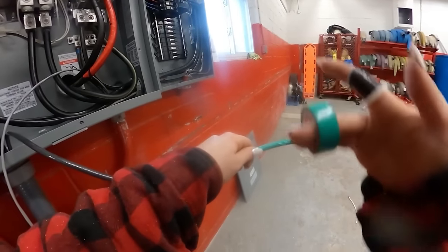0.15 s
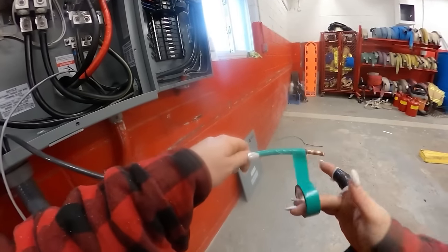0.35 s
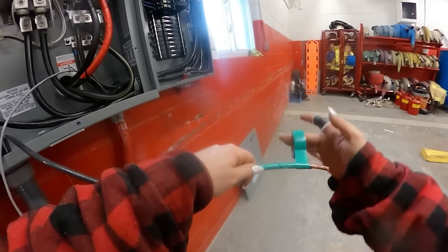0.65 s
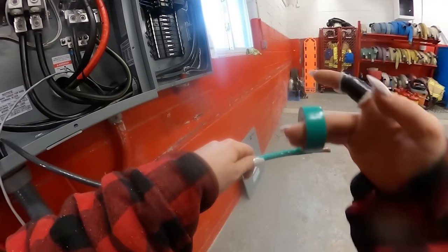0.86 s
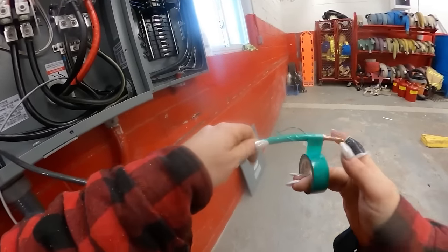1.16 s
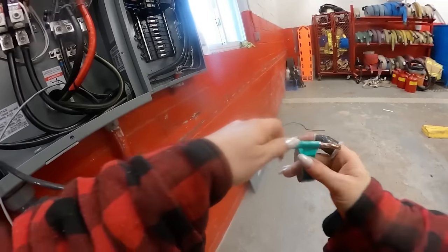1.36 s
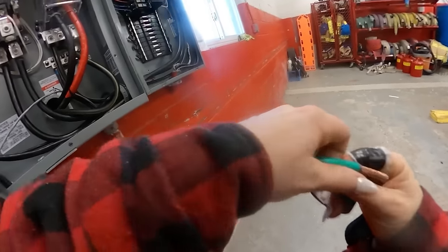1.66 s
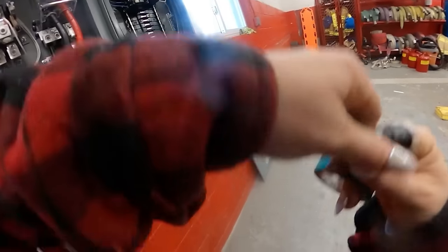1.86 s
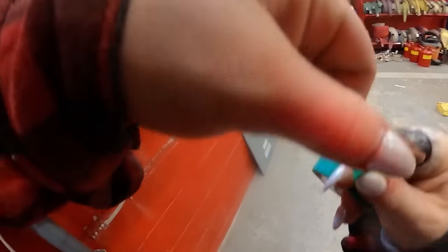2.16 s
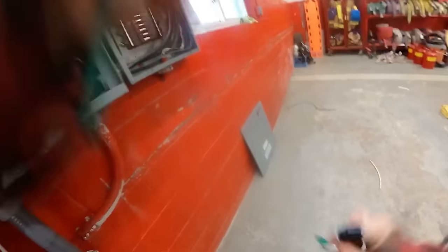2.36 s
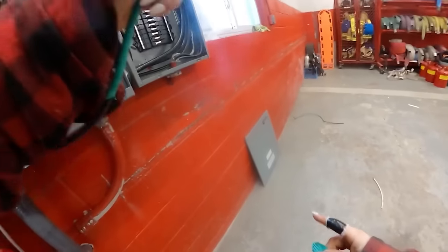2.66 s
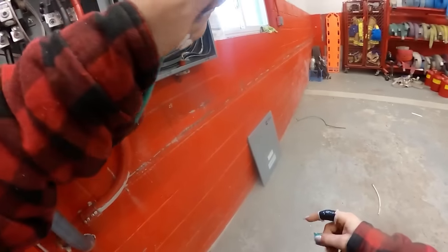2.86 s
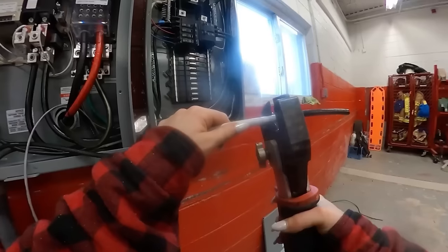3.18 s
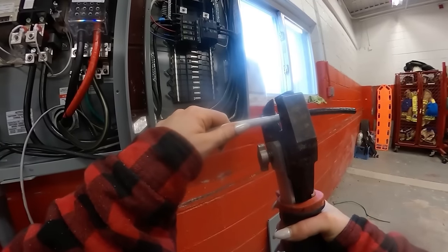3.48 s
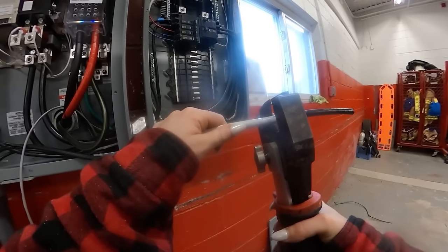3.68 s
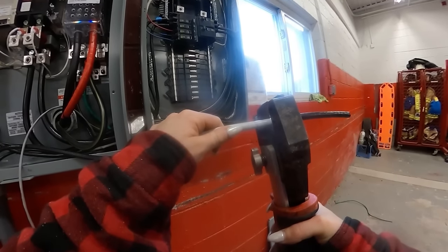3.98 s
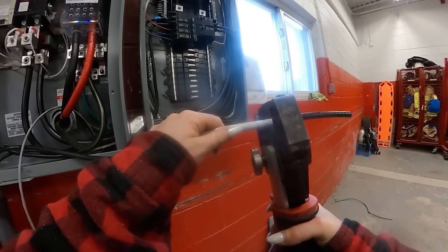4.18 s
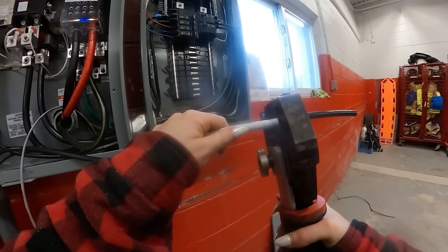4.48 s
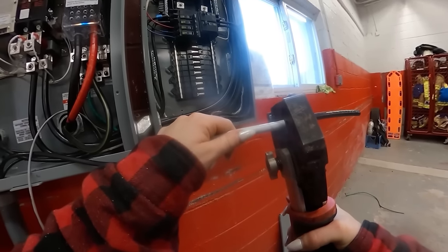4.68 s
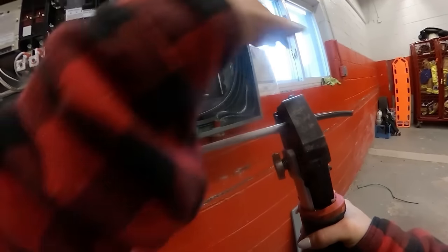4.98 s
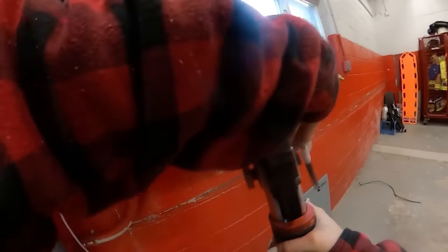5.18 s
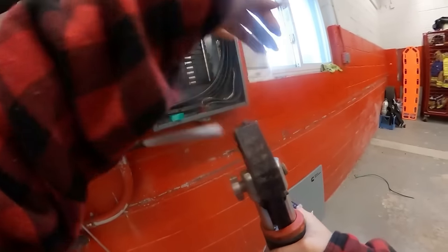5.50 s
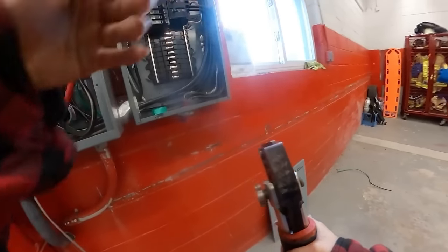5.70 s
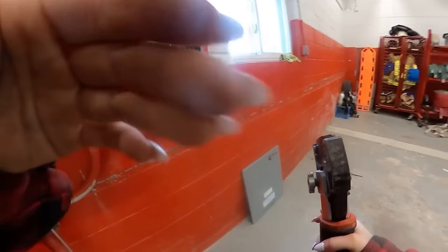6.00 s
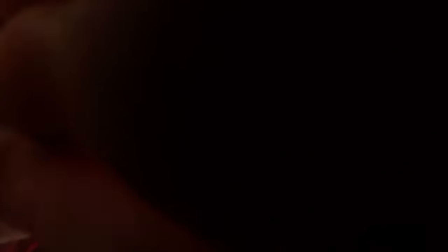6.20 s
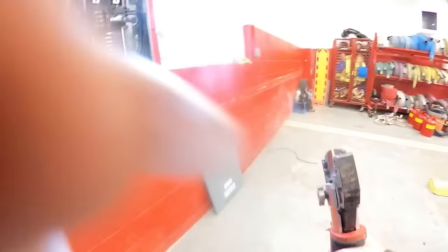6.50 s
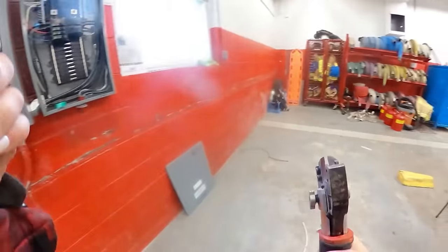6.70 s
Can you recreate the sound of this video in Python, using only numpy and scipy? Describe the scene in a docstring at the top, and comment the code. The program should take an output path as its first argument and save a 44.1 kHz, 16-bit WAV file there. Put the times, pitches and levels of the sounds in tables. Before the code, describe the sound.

Quiet close handling first: adhesive tape peeling, a roll swishing, small ticks and cloth rumble. A crack and heavy bump break the tape, and wire knocks in its panel. Then a buzzing electric crimper holds a hard, gear-rich whine, labouring slightly before clunks, an oil hiss and short gliding whistles. Jaws click open with hall-like echo; a hand scrapes and thuds against the body-worn microphone.

```python
"""Tape and battery crimper in a workshop bay

Close to a body-worn camera, tape crackles off its roll round a wire and snaps; the wire rattles (noise, damped bursts).
A crimper runs two seconds: shaft orders and gear noise sag and squeal under load, then the valve hisses and whistles.
The jaws click open; a hand bumps and rubs the camera (swinging jolts, shaped noise) over air and an early low hum."""
import sys
import numpy as np
from scipy import signal
from scipy.fft import rfft, irfft, next_fast_len
from scipy.io import wavfile
from scipy.ndimage import map_coordinates

SR = 44100
rng = np.random.default_rng(int(sys.argv[2]) if len(sys.argv) > 2 else 0)


def materialize(psi):
    """Save the field psi as 16-bit PCM at rate SR to the path in sys.argv[1].

    A 1-D psi becomes a single channel; in a 2-D psi each row is a channel.
    """
    bounded = np.clip(np.atleast_2d(psi).T, -1, 1)
    quanta = np.round(bounded * 32767).astype(np.int16)
    wavfile.write(sys.argv[1], SR, quanta)


N = 302085


def amp(db):
    """Decibels to gain."""
    return 10 ** (np.asarray(db) / 20)


def unit(x):
    """Scale to rms 1."""
    return x / np.sqrt(np.mean(x ** 2) + 1e-20)


def clock():
    """Time of every sample, in seconds."""
    return np.arange(N) / SR


def along(points, hz):
    """(hz, value) points interpolated on a log frequency axis."""
    point_hz, value = np.transpose(points)
    return np.interp(np.log(hz + 1), np.log(point_hz + 1), value)


def curve(points):
    """(time_s, value) points interpolated to one value per sample."""
    time_s, value = np.transpose(points)
    return np.interp(clock(), time_s, value)


def wobble(rate_hz):
    """Smooth random curve with rate_hz knots a second."""
    knots = rng.standard_normal(int(N * rate_hz / SR) + 4)
    return map_coordinates(knots, [np.arange(N) * rate_hz / SR])


def turning(hz):
    """Phase in radians of something that turns at hz."""
    return 2 * np.pi * np.cumsum(hz) / SR


def filtered(x, response):
    """Multiply the spectrum of x by a response of frequency."""
    size = x.shape[-1]
    padded = next_fast_len(size + SR // 10)
    spectrum = rfft(x, padded) * response(np.fft.rfftfreq(padded, 1 / SR))
    return irfft(spectrum, padded)[..., :size]


def envelope(start_s, length_s, attack_s, release_s):
    """Swell from start_s, hold until length_s is over, then die by 60 dB per release_s."""
    t = clock() - start_s
    swell = np.clip(t / attack_s, 0, 1) ** 2
    return swell * amp(-60 * np.clip((t - length_s) / release_s, 0, 3))


def strokes(rows, attack_s, release_s):
    """Power-summed gain of (start_s, length_s, level_db) strokes with a shared attack and release."""
    power = sum((amp(level_db) * envelope(start_s, length_s, attack_s, release_s)) ** 2
                for start_s, length_s, level_db in rows)
    return np.sqrt(power)


# left-right likeness of sounds in the bay: freq_hz, likeness
BAY_LIKENESS = [(100, .99), (500, 0.99), (1000, 1), (1400, 0.83), (3000, 0.8), (6000, 0.66), (12000, 0.82)]
# left-right likeness of sounds right at the ports: freq_hz, likeness
NEAR_LIKENESS = [(100, 1), (900, 0.27), (1500, 0.087), (10000, 0.41)]


def ports(pair, likeness):
    """Two unrelated signals become what two close microphone ports hear."""
    def mid_side(hz):
        angle = np.arccos(np.clip(along(likeness, hz), -1, 1)) / 2
        return np.array([np.cos(angle), np.sin(angle)])

    mid, side = filtered(pair, mid_side)
    return np.array([mid + side, mid - side])


def rush(spectrum, likeness, grain_db=0):
    """Coloured stereo noise of rms 1; grain_db breaks it into tiny grains."""
    grains = rng.standard_normal((2, N)) * amp(grain_db * wobble(1500))
    return unit(filtered(ports(grains, likeness), lambda hz: amp(along(spectrum, hz))))


def add(track, start_s, sound):
    """Mix a sound into the track at start_s."""
    part = track[..., round(start_s * SR):][..., :sound.shape[-1]]
    part += sound[..., :part.shape[-1]]


def blows(rows, likeness, t60_s, width, hardness):
    """Each contact is a push and a dying rattle in a broad resonance (width: share of its centre)."""
    out, t = np.zeros((2, N)), np.arange(SR // 4) / SR
    fade = amp(-60 * t / t60_s)
    push = hardness * np.linalg.norm(fade) * (t == 0)
    for start_s, level_db, centre_hz in rows:
        def body(hz):
            damping = 1j * hz * centre_hz * width
            return (damping / (centre_hz * centre_hz - hz * hz + damping)) ** 2

        rattle = ports(rng.standard_normal((2, len(t))), likeness) * fade
        hit = unit(filtered(push + rattle, body)) * np.sqrt(np.mean(fade ** 2))
        add(out, start_s, amp(level_db) * hit)
    return out


# decay of the bay: freq_hz, t60_s
BAY_DECAY = [(100, 3.2), (500, 0.95), (2000, 1.55), (4000, 2.03), (7000, 1.05), (10000, 0.46), (13000, 0.7)]


def bay(x):
    """Hard walls answer after 10 ms with a diffuse tail that decays at its own rate in each band."""
    hz, t, noise = signal.stft(rng.standard_normal((2, 2 * SR)), SR, nperseg=256)
    fading = noise * amp(-60 * t / along(BAY_DECAY, hz)[:, None])
    tail = ports(signal.istft(fading, SR, nperseg=256)[1], BAY_LIKENESS)
    late = np.pad(x.mean(axis=0), (SR // 100, 0))[None]
    return signal.fftconvolve(late, tail / np.linalg.norm(tail[0]), axes=1)[:, :N]


# level of the hum: time_s, level_db
HUM_LEVEL = [(0, -43), (0.9, -40), (1.4, -33), (2.2, -34.5), (2.7, -40.5), (3.1, -39.5), (3.2, -87.5)]
# spectrum of moving air: freq_hz, relative_db
AIR_SPECTRUM = [(60, 6), (200, -7.5), (400, -3.5), (800, -15.5), (1700, -10.5), (3000, -26.5), (7000, -21),
                (15000, -48.5)]


def background(hum_hz=72, air_db=-60):
    """A machine hums somewhere in the bay as one unsteady sine, over the noise of moving air."""
    tone = unit(np.sin(turning(hum_hz + .5 * wobble(2))))
    hum = amp(curve(HUM_LEVEL) + .5 * wobble(5.1)) * tone
    return hum + amp(air_db) * rush(AIR_SPECTRUM, BAY_LIKENESS)


# arm movements: start_s, length_s, sleeve_db, rumble_db
ARM_MOVES = [(0, 0.88, -66, -38.5), (1.03, 1.46, -58, -35), (2.446, .3, -52, -46.5),
             (5.42, .63, -46.5, -43), (6.18, .1, -40, -36.5), (6.45, .17, -52, -35),
             (6.72, .13, -46, -36.5)]
# sleeve noise: freq_hz, relative_db
CLOTH_SPECTRUM = [(60, -19.5), (150, 2), (300, -5), (700, -16.5), (2000, -28), (8000, -45), (15000, -57.5)]
# camera mount rumble: freq_hz, relative_db
RUMBLE_SPECTRUM = [(11, -38), (18, -1.5), (44, 7.5), (64, 4), (84, 0), (194, -26), (300, -40.5), (390, -47),
                   (660, -120)]
STILL_CLOTH_DB, STILL_RUMBLE_DB = -60, -45  # at rest


def arm_movement(attack_s=0.066, release_s=0.57):
    """The moving arm brushes the sleeve and shakes the camera: broad noise and low rumble."""
    brushing = strokes([(s, length_s, db) for s, length_s, db, _ in ARM_MOVES], attack_s, release_s)
    shaking = strokes([(s, length_s, db) for s, length_s, _, db in ARM_MOVES], attack_s, release_s)
    cloth = np.hypot(amp(STILL_CLOTH_DB), brushing) * amp(2 * wobble(12))
    rumble = np.hypot(amp(STILL_RUMBLE_DB), shaking) * amp(wobble(6.5))
    return (cloth * rush(CLOTH_SPECTRUM, BAY_LIKENESS, grain_db=1)
            + rumble * rush(RUMBLE_SPECTRUM, BAY_LIKENESS))


# skin drags over the camera case: start_s, swell_s, fade_t60_s, level_db
SKIN_RUBS = [(6.165, 0.022, 0.11, -43), (6.205, 0.039, .34, -31.5), (6.2, .425, 0.03, -32)]
# skin noise: freq_hz, relative_db
SKIN_SPECTRUM = [(400, -10.5), (850, -19.5), (1250, 3), (2500, 0.5), (3300, -4.5), (4100, -1.5), (4900, -6),
                 (6600, 1.5), (7500, -4.5), (8300, -13.5), (15000, -25)]
RUB_PAN_DB = 2.5  # left minus right: the hand rubs nearer the left port


def rubbing():
    """Skin sticks and slips on the camera case as grainy noise."""
    drag = sum(amp(level_db) * envelope(start_s, swell_s, swell_s, fade_s)
               for start_s, swell_s, fade_s, level_db in SKIN_RUBS)
    pan = amp([[RUB_PAN_DB / 2], [-RUB_PAN_DB / 2]])
    return drag * pan * amp(wobble(30)) * rush(SKIN_SPECTRUM, NEAR_LIKENESS, grain_db=2.5)


# fingers tap the camera case: start_s, level_db, centre_hz
CASE_TAPS = [(2.381, -13, 180), (6.1605, -19, 3200), (6.161, -15.5, 900), (6.162, -18, 220),
             (6.5185, -19, 2300), (6.6013, -15, 1700), (6.602, -18, 150), (6.611, -22, 4000),
             (6.625, -17, 1500)]
# jolts of the camera: start_s, level_db, pitch_hz, length_s, left_minus_right_db
CAMERA_JOLTS = [(2.369, -7.5, 63.3, 0.039, 1), (6.147, -18, 45.3, 0.04, -9), (6.176, -14.5, 66, 0.03, -7),
                (6.599, -19.5, 64.4, 0.036, -5)]


def bumps():
    """Taps excite the case; jolts swing it briefly at a low pitch."""
    out = blows(CASE_TAPS, NEAR_LIKENESS, t60_s=0.021, width=1.06, hardness=0.39)
    for start_s, level_db, pitch_hz, length_s, pan_db in CAMERA_JOLTS:
        t = np.arange(int(length_s * SR)) / SR
        sway = -np.sin(2 * np.pi * pitch_hz * t) * np.sin(np.pi * t / length_s) ** 2
        add(out, start_s, amp([[level_db + pan_db / 2], [level_db - pan_db / 2]]) * sway)
    return out


# the wire knocks about in its panel: start_s, level_db, centre_hz
WIRE_KNOCKS = [(1.804, -46, 700), (1.961, -50, 800), (2.407, -32.5, 1200), (2.425, -31, 546),
               (2.46, -35, 900), (2.495, -35, 720), (2.518, -29.5, 540), (2.661, -37.5, 1000),
               (2.694, -33.5, 720), (2.968, -49, 1800), (5.92, -39, 387)]


def wire():
    """The wire strikes its panel, which rattles in a broad resonance."""
    return blows(WIRE_KNOCKS, BAY_LIKENESS, t60_s=.14, width=1.36, hardness=.42)


# the tape parting: freq_hz, level_db, t60_s
SNAP_MODES = [(800, -4.5, 0.0018), (2500, 4.5, 0.0019), (4000, -1.5, 0.0022), (6000, -1, 0.0043),
              (9200, -7, 0.0042)]
SNAP_S = 2.381


def snap():
    """The stretched tape parts in one crack of heavily damped sines."""
    out, t = np.zeros((2, N)), np.arange(SR // 20) / SR
    crack = sum(amp(level_db - 60 * t / t60_s) * np.sin(2 * np.pi * freq_hz * t)
                for freq_hz, level_db, t60_s in SNAP_MODES)
    add(out, SNAP_S, crack)
    return out


# pulls that peel tape off the roll: start_s, length_s, level_db
TAPE_PULLS = [(0, 0.34, -69), (.91, .17, -62.5), (1.25, .2, -67), (1.46, 0.093, -55.5), (1.66, .3, -61.5),
              (1.95, .16, -50)]
# peeling noise: freq_hz, relative_db
PEEL_SPECTRUM = [(500, -8), (1200, -0.5), (2200, 1.5), (3300, -2), (4300, -3), (7000, 3.5), (9000, 1.5),
                 (15000, -8.5)]
# the roll slides round the finger: start_s, length_s, level_db
ROLL_SLIDES = [(0, 0.075, -69), (.16, .08, -59), (.62, 0.14, -75.5), (.9, .12, -61), (1.48, 0.046, -62),
               (2.06, .04, -52.5)]
# sliding noise: freq_hz, relative_db
ROLL_SPECTRUM = [(3000, -25.5), (4800, -9.5), (5700, -1), (6500, 3), (7300, -9), (12000, -25)]
TAUT_DB, NEARING_DB_PER_S = -84, 6.5  # taut tape crackles more as the hands come closer


def tape():
    """The glue lets go in a fine crackle, while the roll swishes round the finger."""
    taut = amp(TAUT_DB + NEARING_DB_PER_S * clock()) * (clock() < SNAP_S)
    glue = np.hypot(taut, strokes(TAPE_PULLS, attack_s=0.051, release_s=.17))
    peel = glue * amp(1.6 * wobble(40)) * rush(PEEL_SPECTRUM, NEAR_LIKENESS, grain_db=3.0)
    slide = strokes(ROLL_SLIDES, attack_s=0.036, release_s=0.39)
    return peel + slide * amp(1.6 * wobble(27)) * rush(ROLL_SPECTRUM, NEAR_LIKENESS, grain_db=3.0)


# ticks of tape and wire: start_s, level_db, centre_hz
HAND_TICKS = [(1.033, -38, 5460), (1.2995, -47.5, 2480), (1.5305, -39, 5160), (1.961, -32, 4800),
              (2.0084, -42, 3800), (2.096, -38, 4500), (2.109, -34.5, 5500), (2.2284, -48, 5500),
              (2.3705, -31, 2200), (2.621, -27, 7400), (3.0775, -42, 7060)]
FAINT_TICK_DB, FAINT_TICK_HZ = -57, 6500  # loudest stray tick, centre


def ticks(count=8):
    """Tape and wire tick between the fingers until the crimper starts, with stray faint ticks."""
    stray = [(when * ON_S, FAINT_TICK_DB - 6 * soft, FAINT_TICK_HZ) for when, soft in rng.random((count, 2))]
    return blows(HAND_TICKS + stray, NEAR_LIKENESS, t60_s=0.015, width=1.7, hardness=.41)


# steel jaws and latch: start_s, level_db, centre_hz
JAW_CLICKS = [(5.2795, -16, 6000), (5.324, -16.5, 5060), (5.373, -14.5, 7184), (5.67, -10.5, 7200),
              (5.687, -22.5, 6000)]


def jaws():
    """Hard steel contacts click in short bright bursts."""
    return blows(JAW_CLICKS, BAY_LIKENESS, t60_s=.014, width=.7, hardness=1.6)


# the lug crunches and the ram clunks: start_s, level_db, centre_hz
RAM_CLUNKS = [(5.085, -23, 650), (5.118, -18.5, 270), (5.141, -20.5, 800), (5.24, -24, 1700),
              (5.313, -22, 1200), (5.39, -21, 340), (5.67, -29, 1300)]


def ram():
    """Crushed lug and moving ram thud in broad resonances."""
    return blows(RAM_CLUNKS, BAY_LIKENESS, t60_s=.07, width=1.1, hardness=.3)


# oil spurts through the release valve: start_s, length_s, level_db
OIL_SPURTS = [(5.288, .035, -22.5), (5.366, .085, -25.5)]
# oil hiss: freq_hz, relative_db
OIL_SPECTRUM = [(150, -33), (400, 1), (1200, -1.5), (2800, -1), (3700, 2.5), (4600, -10.5), (7500, -10),
                (15000, -47)]
# the valve whistles as it opens and shuts: start_s, length_s, from_hz, to_hz, level_db
VALVE_WHISTLES = [(5.31, 0.0097, 600, 530, -20), (5.378, .036, 500, 1296, -27.5),
                  (5.42, .03, 1401, 481, -22)]


def valve(rough=0.0297, overtone_db=-12):
    """Oil escapes with a hiss and rough two-partial whistles that glide with the flow."""
    hiss = strokes(OIL_SPURTS, attack_s=0.013, release_s=0.036)
    out = hiss * rush(OIL_SPECTRUM, BAY_LIKENESS, grain_db=2.5)
    for start_s, length_s, from_hz, to_hz, level_db in VALVE_WHISTLES:
        hz = np.interp(clock(), [start_s, start_s + length_s], [from_hz, to_hz])
        phase = turning(hz * (1 + rough * wobble(500)))
        whistle = unit(np.sin(phase) + amp(overtone_db) * np.sin(2 * phase))
        out = out + amp(level_db) * envelope(start_s, length_s, attack_s=0.0033, release_s=.02) * whistle
    return out


# shaft and gear mesh orders: multiple, relative_db
SHAFT_ORDERS = [(1, -1), (2, -9), (2.906, -22.5), (3, -7.5), (3.09, -31), (3.78, -23.5), (3.875, -22.5),
                (4, -15), (5, -17.5), (6, -19), (7, -14.5), (8, -13.5), (9, -20), (10, -17.5), (11, -20.5),
                (12, -20.5), (13, -19.5), (14, -18.5), (16, -19), (18, -20.5), (19, -20), (20, -26),
                (21, -26.5), (23, -26.5)]
# gear noise: freq_hz, relative_db
GEAR_SPECTRUM = [(100, -33.5), (220, -23.5), (340, 2.5), (450, 1), (660, -4), (950, 0), (2000, -0.5),
                 (2700, 1.5), (3200, -3), (3900, 2.5), (5000, -6.5), (7600, -8), (10000, -18), (15500, -29)]
# the ram squeezes the lug harder until the copper yields: time_s, load_0_to_1
RAM_LOAD = [(4.15, 0), (4.42, .22), (4.65, .62), (4.87, .92), (5.08, 0.97), (5.11, 0.17)]
ON_S, COAST_S, STOP_S = 3.137, 5.21, 5.272  # starts, loses power, begins to die away
ATTACK_S, RELEASE_T60_S = 0.019, 0.097
FREE_HZ, SAG_HZ = 388.1, 9.4  # unloaded shaft speed, drop at full load
SPIN_UP_HZ, SPIN_UP_S = 3.4, 0.1302  # the last of the speed is gained slowly
BRAKE_HZ_PER_S2 = 8200  # coasting, the shaft slows ever faster
WHINE_DB, WHINE_LOAD_DB, GEAR_DB = -21.6, -2.2, -25.1  # whine, its change at full load, gear noise
SQUEAL_DB, SQUEAL_LOAD = -26.5, 0.36  # eighth-order squeal, load at which it is full
YIELD_DB = -1.8  # gear noise change per unit of load dropped


def motor(flutter=0.00093, load_flutter=.005, coast_flutter=.4, sag=0.0043, throb=0.22, mesh=0.21,
          drone_db=-22.5, damping_db=9, blur_db=0.05):
    """Shaft orders over gear noise; pump strokes modulate the speed, load slows and unsteadies it."""
    t, load = clock(), curve(RAM_LOAD)
    spin_up = SPIN_UP_HZ * np.exp(-np.maximum(t - ON_S, 0) / SPIN_UP_S)
    braking = BRAKE_HZ_PER_S2 * np.maximum(t - COAST_S, 0) ** 2
    hz = np.maximum(FREE_HZ - SAG_HZ * load - spin_up - braking, 0)
    stroke = turning(hz / 10.7)  # pump gearing
    unsteady = (flutter + load_flutter * load + coast_flutter * braking / FREE_HZ) * wobble(70)
    shaft = turning(hz * (1 + unsteady + sag * np.sin(stroke)))

    # oil pressure holds its peak; high orders sink into the grinding as it builds
    pressure = np.maximum.accumulate(load)
    whine = 0
    for order, level_db in SHAFT_ORDERS:
        order_db = level_db - blur_db * order * pressure + min(order, 4) * 0.39 * wobble(12)
        whine = whine + amp(order_db) * np.sin(order * shaft + rng.uniform(0, 2 * np.pi))
    # first reduction gear, damped by the pressure
    drone = amp(drone_db - damping_db * pressure) * np.sin(shaft * .315)
    squeal_gain = amp(SQUEAL_DB + wobble(25)) * np.minimum(load / SQUEAL_LOAD, 1) ** 4
    squeal = squeal_gain * np.sin(8 * shaft)
    tones = np.sqrt(2) * (amp(WHINE_DB + WHINE_LOAD_DB * load) * (whine + drone) + squeal)

    # gears rasp in step with the shaft and swell with each stroke
    teeth = np.cos(shaft) + np.cos(2 * shaft) + .5 * np.cos(3 * shaft)
    gate = unit(1 + throb * np.sin(stroke) + mesh * teeth * (hz > 0))
    rasp_gain = amp(GEAR_DB + YIELD_DB * (pressure - load) + 0.92 * wobble(15))
    rasp = rasp_gain * gate * rush(GEAR_SPECTRUM, BAY_LIKENESS, grain_db=1.5)
    return envelope(ON_S, STOP_S - ON_S, ATTACK_S, RELEASE_T60_S) * (tones + rasp)


def scene():
    """Mix each source with its share of the room."""
    tool = motor() + valve()
    clicks = jaws()
    knocks = wire() + ram()
    taping = tape() + ticks()
    crack = snap()  # a hand's width from the ports, so almost dry
    room = bay(amp(-14.0) * tool + amp(-9.5) * clicks + amp(-6.5) * knocks
               + amp(-14.5) * taping + amp(-27) * crack)
    right_hand = amp([[-.8], [.8]]) * (clicks + taping + crack)
    handling = bumps() + rubbing() + arm_movement()
    return tool + knocks + right_hand + room + handling + background()


# the microphone's treble: freq_hz, gain_db
MIC_TREBLE = [(8500, 0), (11000, -5.5), (15000, -16.5)]
TOP_HZ = 15800


def record(dry):
    """The microphone's dull top, clipping at full scale and the camera's steep band limit."""
    heard = np.clip(filtered(dry, lambda hz: amp(along(MIC_TREBLE, hz))), -1, 1)
    return filtered(heard, lambda hz: 1 / (1 + (hz / TOP_HZ) ** 120))


dry = scene()
out = record(dry)
materialize(out)
```